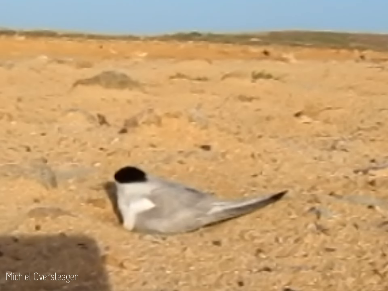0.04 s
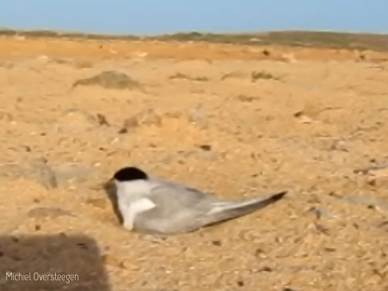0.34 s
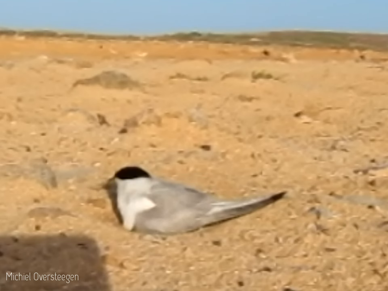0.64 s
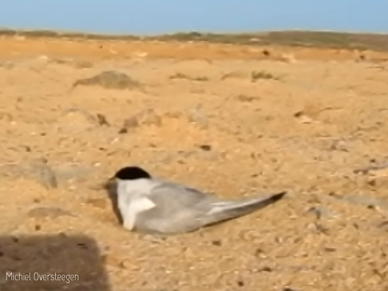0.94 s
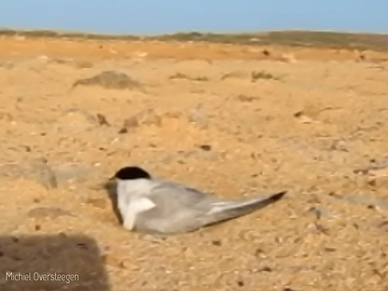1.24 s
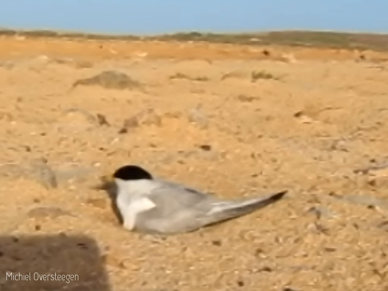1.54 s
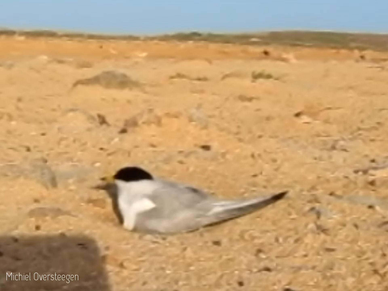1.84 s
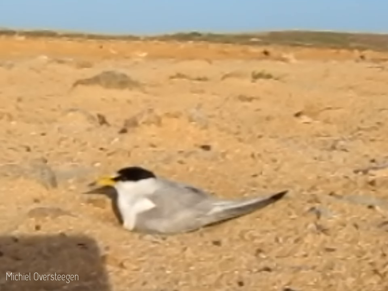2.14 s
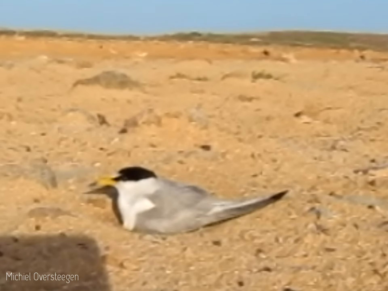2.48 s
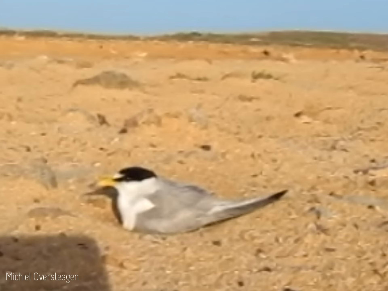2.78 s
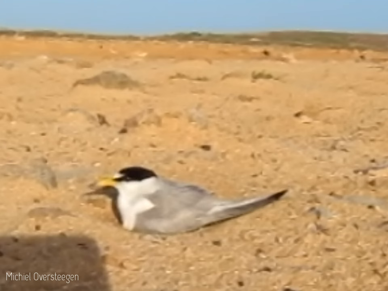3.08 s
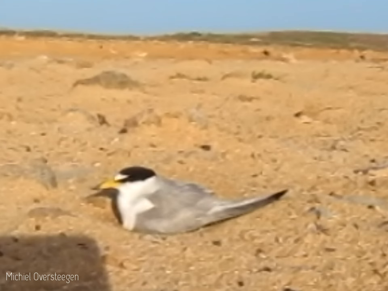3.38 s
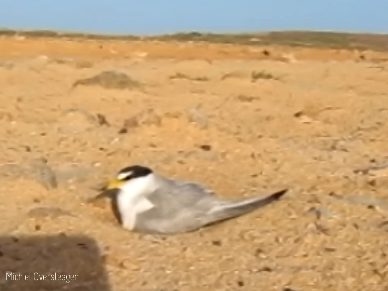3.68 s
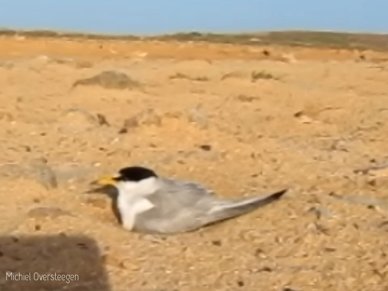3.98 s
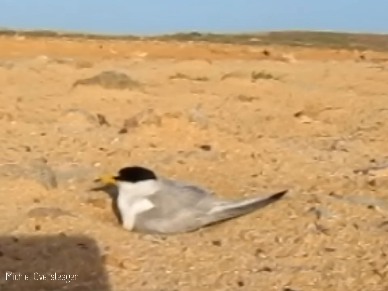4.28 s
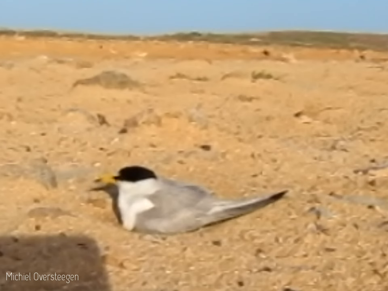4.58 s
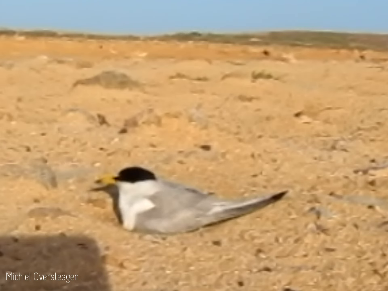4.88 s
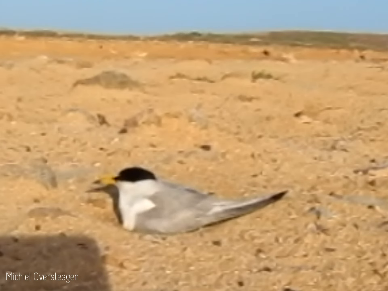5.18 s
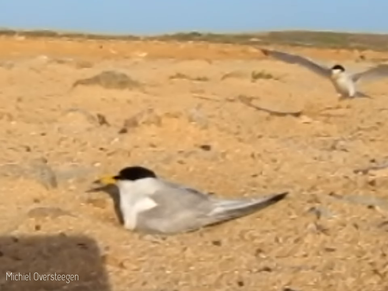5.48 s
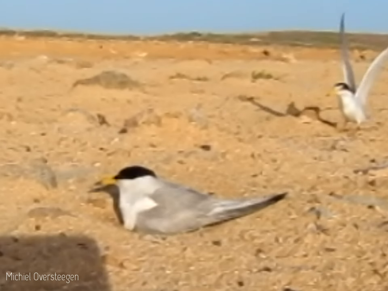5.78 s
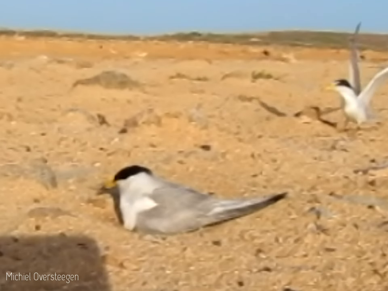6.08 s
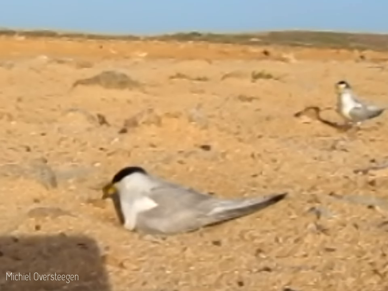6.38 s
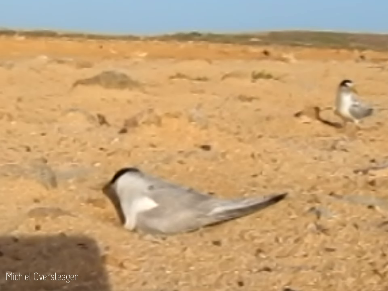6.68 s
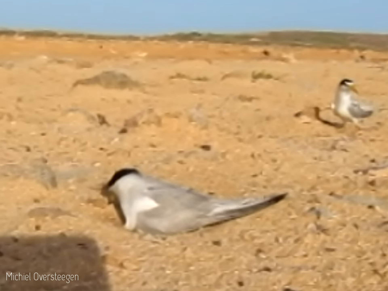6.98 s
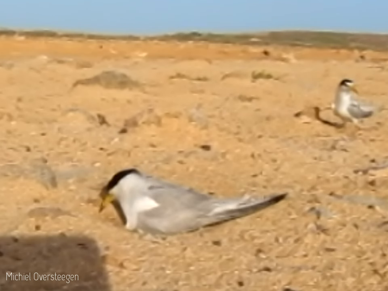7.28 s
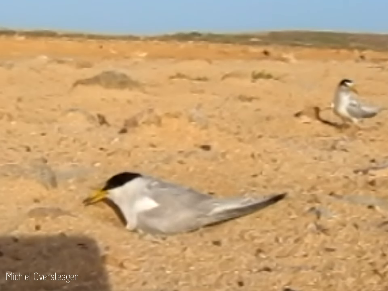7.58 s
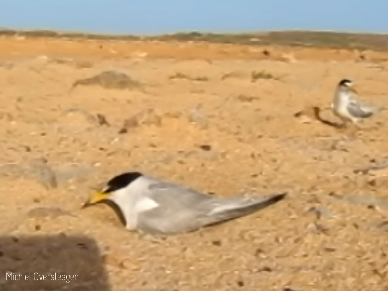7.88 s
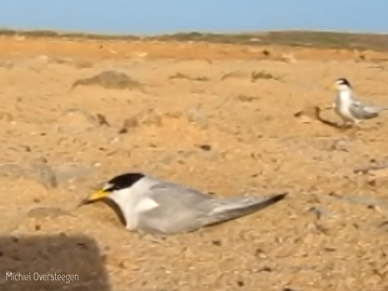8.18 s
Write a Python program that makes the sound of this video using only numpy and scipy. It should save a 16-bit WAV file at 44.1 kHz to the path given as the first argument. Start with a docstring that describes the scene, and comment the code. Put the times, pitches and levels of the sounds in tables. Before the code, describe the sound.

Gusty wind buffets the microphone on an open shore throughout, with low rumbling and irregular thumps over a very faint wash of distant surf. The wind is strong in the first second, eases until about 3.5 seconds, then returns hard at 4 and keeps gusting.

Terns give short, harsh calls, each a rattle that clears into a high note and drops away. These come singly at about 0.1, 0.7, 1.5 and 2.2 seconds, the second and fourth faint, then louder at 3.8 and 4.2. Between 4.7 and 5.2 seconds an arriving bird gives three shrill, cracking cries. Rasps then come more often: two at 5.6 and 5.9, three soft, hoarse ones from 6.2 to 6.7, and a louder, higher one near 6.9. Four quick chips follow from 7.1 to 7.3, then a faint rasp and a strong, high rising one around 7.7 seconds.

```python
"""Little terns on a windy shore

Terns call over a nest on open sand, each voice a vibrating membrane filtered by throat and beak.
Rasping calls start as a rattle, clear into a rising tone and fall off; a bird flying in gives sharp
cries, then chips after landing. Turbulent wind buffets the microphone with swings of pressure,
and a soft wash of distant surf lies behind."""
import sys
import numpy as np
from scipy import signal
from scipy.io import wavfile
from scipy.ndimage import uniform_filter1d, map_coordinates

SR = 44100
rng = np.random.default_rng(int(sys.argv[2]) if len(sys.argv) > 2 else 0)


def waveform_to_disk(signal):
    """Save audio, clipped to [-1, 1], as 16-bit WAV at the path in sys.argv[1]."""
    frames = np.transpose(np.atleast_2d(signal))
    scaled = np.clip(frames, -1, 1) * 32767
    samples = np.round(scaled).astype(np.int16)
    wavfile.write(sys.argv[1], SR, samples)


N = 372204
TIME = np.arange(N) / SR
CUTOFF_HZ = 15900
WAVER = .008   # relative pitch jitter of a clear voice


def from_db(db):
    """Amplitude ratio of a level in decibels."""
    return 10 ** (np.asarray(db) / 20)


def in_time(rows):
    """Linear interpolation of (time_s, value) rows at every sample."""
    return np.interp(TIME, *np.transpose(rows))


def at_hz(points, hz):
    """Interpolation of a spectrum on a log-frequency axis."""
    freqs, levels = np.transpose(points)
    return np.interp(np.log(hz), np.log(freqs), levels)


def drift(rate_hz, size=N):
    """A smooth random process of spread near 1, with `rate_hz` new values a second."""
    steps = np.arange(size) * rate_hz / SR
    return map_coordinates(rng.standard_normal(SR // 10), [steps], order=3, mode="mirror")


def during(start, end):
    """The sample times of one note."""
    return TIME[(TIME >= start) & (TIME < end)]


def add(out, start, sound):
    """Superposition: a sound adds to the mix from its start time."""
    first = max(int(start * SR), 0)
    out[first:first + len(sound)] += sound[:N - first]


def coloured_noise(colour):
    """Spectral shaping: weighted half-octave bands of white noise, scaled to unit power."""
    edges = 11 * 2 ** np.arange(0, 10.6, .5)
    white, out = rng.standard_normal((2, N + SR // 2)), 0
    for k, (low, high) in enumerate(zip(edges, edges[1:])):
        hz = np.sqrt(low * high)
        if colour[0][0] <= hz <= colour[-1][0]:
            bandpass = signal.butter(2, [low, high], "band", fs=SR, output="sos")
            out = out + signal.sosfilt(bandpass, white[k % 2])[-N:] * from_db(at_hz(colour, hz))
    return out / np.sqrt(np.mean(out ** 2) + 1e-20)


def surf():
    """Distant surf is broadband noise under a slow amplitude envelope."""
    # swell of the wash: time_s, level_db
    swell = [(0, -54.5), (1.2, -56.5), (3.0, -52), (3.65, -47), (4.02, -48), (4.18, -53), (8.44, -56)]
    # spectrum of the wash: frequency_hz, relative_db
    colour = [(200, 13), (1000, 10.5), (2000, 4.5), (3600, 4), (5200, -0.5), (7000, -9), (15500, -22.5)]
    return from_db(in_time(swell)) * coloured_noise(colour)


def wind_power(steepness=2.4):
    """Incoherent powers add: each gust is a bell-shaped swell on top of the breeze."""
    # light air between gusts: time_s, level_db
    breeze = [(0, -35.5), (1.65, -45), (3.1, -44), (4.0, -37), (8.44, -36.5)]
    # gusts at the microphone: crest_s, length_s, level_db
    gusts = [(0.244, 0.1, -21.5), (0.534, 0.22, -22), (0.762, 0.15, -23), (1.014, 0.17, -28.5),
             (1.202, 0.035, -27), (1.465, 0.22, -29), (1.779, 0.069, -30), (2.264, 0.093, -30.5),
             (2.353, 0.044, -25.5), (2.852, 0.024, -31.5), (3.531, 0.18, -27), (4.05, 0.24, -21),
             (4.101, 0.086, -17.5), (4.358, 0.049, -20.5), (4.593, 0.15, -21), (4.93, 0.18, -28.5),
             (5.308, 0.18, -26), (5.508, 0.038, -21.5), (5.684, 0.24, -22.5), (5.885, 0.038, -20),
             (6.037, 0.12, -23.5), (6.262, 0.042, -20), (6.416, 0.029, -20.5), (6.683, 0.11, -20),
             (6.861, 0.033, -22.5), (7.237, 0.058, -22.5), (7.366, 0.23, -24.5), (7.648, 0.042, -24),
             (7.767, 0.067, -25.5), (8.079, 0.11, -20), (8.223, 0.049, -19)]
    power = from_db(in_time(breeze)) ** 2
    for crest, length, level_db in gusts:
        away = 2 * np.abs(TIME - crest) / length
        power = power + from_db(level_db) ** 2 * np.exp(-np.minimum(away ** steepness, 20))
    return power


def wind(rumble_db=5.0, eddy_db=-1.0, usual_db=-26, ceiling_db=-17, inertia_s=.019, follow=.61):
    """Turbulent pressure: a slow rumble, and eddies that hit harder and pass faster in faster air."""
    # spectra of the rumble and the eddies: frequency_hz, relative_db
    rumble_colour = [(12, 1), (60, 0.5), (110, -5), (380, -25)]
    eddy_colour = [(35, -27), (120, 1), (260, 1.5), (450, -14), (700, -34), (1500, -58)]
    power = wind_power()
    swing_db = 10 * np.log10(uniform_filter1d(power, int(inertia_s * SR))) - usual_db
    lumps_db = 7.5 * np.tanh(drift(rate_hz=75))
    rumble = from_db(rumble_db + follow * swing_db + lumps_db / 2) * coloured_noise(rumble_colour)
    # the eddies level off, so the strongest gusts add mostly rumble
    gust_db = -10 * np.log10(1 / power + from_db(-ceiling_db) ** 2) - usual_db
    force = from_db(gust_db + lumps_db)
    # frozen turbulence: one pattern is carried across the microphone port at the speed of the air
    travelled = np.cumsum(force ** .18)
    eddies = map_coordinates(coloured_noise(eddy_colour), [travelled], order=3, mode="mirror")
    return from_db(usual_db) * (rumble + from_db(eddy_db) * force * eddies)


def small_vortices(count=130, lift_db=7, spread_db=3, pitch_hz=330, pitch_spread=.201):
    """Random arrivals, each scaled by the wind that carries it: time_s, strength_db, pitch_hz."""
    arrival = rng.integers(N, size=count)
    strength, detune = rng.standard_normal((count, 2)).T
    strength_db = 10 * np.log10(wind_power()[arrival]) + lift_db + spread_db * strength
    return list(zip(arrival / SR, strength_db, pitch_hz * np.exp(pitch_spread * np.tanh(detune))))


def buffets(gain_db=-2.0, body=.45, wake_db=-12, wake_s=.0045, tick_db=-34):
    """A vortex crossing the port makes a steep pressure pulse inside a broad one, then a brief wake."""
    # hard vortices: time_s, strength_db, pitch_hz
    hard_vortices = [(0.317, -3.5, 476), (0.323, -2.5, 487), (0.414, -6.5, 457), (0.487, -5, 400),
                     (0.583, -4.5, 346), (0.736, -3, 481.4), (0.757, -7.5, 408), (0.995, -4, 449),
                     (1.945, 0, 484), (3.388, -4, 304.5), (3.677, -3, 272.6), (3.991, -3.5, 488.1),
                     (4.096, -2.5, 401), (4.148, -4, 317.3), (4.165, -9, 398), (4.376, -10, 447),
                     (4.547, -2.5, 401.8), (4.558, -2, 317), (4.632, -10, 369), (5.34, -13.5, 431.5),
                     (5.5, -6.5, 329.2), (5.731, -7.5, 377), (5.998, 0, 287.3), (6.265, 1, 268.7),
                     (6.693, -2, 407), (7.298, -8, 298.8), (7.432, -7, 300.3), (8.076, -7, 491),
                     (8.116, 0, 573.3), (8.207, -2.5, 336)]
    out = np.zeros(N)
    t = np.arange(-SR // 20, SR // 20) / SR
    age = np.maximum(t, 0) / wake_s
    for time_s, strength_db, hz in hard_vortices + small_vortices():
        tick, core, skirt = (np.imag((1 - 2j * np.pi * f * t / 3) ** -4) for f in (hz * 6, hz, hz / 4))
        wake = age * np.exp(1 - age) * drift(2 * hz, len(t))
        # a sharp bright tick, like input overload, on the highest-pitched thumps
        tick_weight = np.clip((hz - 480) / 25, 0, 3)
        pulse = core + body * skirt + from_db(wake_db) * wake + from_db(tick_db) * tick_weight * tick
        add(out, time_s + t[0], from_db(strength_db + gain_db) * pulse)
    return out


def syrinx(t, pitch, level_db, gape, bright_hz, jitter, shimmer_db=3.98, purity_db=15):
    """Source and filter: a membrane's harmonics, shaped by throat and beak, with a little air noise."""
    # throat response with the beak nearly shut and wide open: frequency_hz, gain_db
    beak_shut = [(600, -15), (1200, 13.5), (3150, 1.5), (3750, -24), (4600, -22.5), (6300, -14.5),
                 (7300, -33), (8500, -29), (10000, -36.5), (15500, -33.5)]
    beak_open = [(600, -12), (1800, -14.5), (2300, -3.5), (2800, -5), (3400, 0.5), (4300, 0.5), (5700, -5),
                 (7200, -9), (8800, -19), (15500, -36.5)]
    lift_db, half_width_octaves = 4.5, .31   # the band that a call favours
    pitch = pitch * (1 + jitter * drift(900, len(t)))
    phase = 2 * np.pi * np.cumsum(pitch) / SR
    # a taut, high-pitched membrane closes softly and loses its top overtones
    taut = np.clip(pitch / 400 - 3, 0, 1)
    tone, power = 0, 0
    for k in range(1, 15):
        hz = k * pitch
        throat_db = (1 - gape) * at_hz(beak_shut, hz) + gape * at_hz(beak_open, hz)
        loss_db = purity_db * taut * np.interp(hz, [8200, 9400], [0, 1])
        bright_db = lift_db * np.exp(-np.square(np.log2(hz / bright_hz) / half_width_octaves))
        flicker_db = shimmer_db * drift(56, len(t))
        gain = from_db(throat_db - loss_db + bright_db + flicker_db) * (hz < CUTOFF_HZ)
        tone = tone + gain * np.sin(k * phase)
        power = power + gain ** 2 / 2
    air = .03 * drift(4000, len(t))
    edges = np.clip(np.minimum(t - t[0], t[-1] - t) / .003, 0, 1)
    return tone / np.sqrt(power) * (1 + air) * from_db(level_db) * edges


def chips(length_s=.031, sag=.61, fade_db=15, bright_hz=7000):
    """Coupled modulation: one push of air raises and lowers pitch and loudness together."""
    # short arched chips: start_s, top_hz, level_db, gape (0 shut, 1 open)
    notes = [ (7.099, 1431, -27, 0.53), (7.161, 1306, -29, 0.54), (7.225, 1375, -28, 0.49),
             (7.303, 1199, -31, 0.42)]
    out = np.zeros(N)
    for start, top_hz, level_db, gape in notes:
        t = during(start, start + length_s)
        slack = np.linspace(-1, 1, len(t)) ** 2
        pitch = top_hz * (1 - sag * slack)
        add(out, start, syrinx(t, pitch, level_db - fade_db * slack, gape, bright_hz, WAVER))
    return out


def cries(bright_hz=4400, ragged_s=.015, ragged=.037):
    """Register jumps: shrill open-beaked cries leap in pitch, and jitter frays both their ends."""
    # one contour for each cry: time_s, pitch_hz, level_db
    contours = [
        [(4.671, 1235, -29), (4.684, 1900, -14), (4.698, 1790, -18), (4.716, 1040, -35), (4.741, 1194, -21.5),
         (4.795, 1140, -22.5), (4.855, 1002, -20), (4.871, 726, -40)],
        [(4.959, 954, -29), (4.998, 1294, -23.5), (5.007, 1552, -16), (5.023, 1608, -18.5), (5.040, 1120, -31)],
        [(5.067, 1192, -42), (5.078, 1610, -18), (5.095, 1900, -16), (5.097, 1185, -17.5), (5.126, 1133, -23.5),
         (5.128, 1713, -17), (5.143, 1550, -21), (5.157, 990, -37)],
    ]
    out = np.zeros(N)
    for contour in contours:
        times, pitches, levels = np.transpose(contour)
        t = during(times[0], times[-1])
        pitch, level_db = np.interp(t, times, pitches), np.interp(t, times, levels)
        # the first cry cracks before the voice takes hold
        cracking = .06 * (t < 4.738) * np.clip((-14 - level_db) / 7, 0, 1)
        fraying = ragged * np.exp(-np.minimum(t - times[0], times[-1] - t) / ragged_s)
        add(out, times[0], syrinx(t, pitch, level_db, 1, bright_hz, WAVER + cracking + fraying))
    return out


def rasps(start_hz=1230, fall_s=.023, fall_ratio=.31, fade_db=18, sag=.35, creak=.04):
    """Pulse modulation: quick bursts of voice lengthen and fuse into a clear tone, which drops away."""
    # rasping calls: start_s, clear_s, crest_s, clear_hz, crest_hz, level_db, swell_db, gape, bright_hz
    calls = [ (.085, .207, .240, 1630, 1650, -28.5, 19, 0.43, 7450),
             (.645, 0.77, .812, 1270, 1220, -41.5, 2.5, 0.23, 7900),
             (1.481, 1.636, 1.640, 1944, 1860, -32, 10, 0.4, 7560),
             (2.176, 2.263, 2.323, 1207, 1241, -36, 2.5, 0.38, 12070),
             (3.755, 3.855, 3.884, 1298, 1438, -25, 23.5, 0.84, 5550),
             (4.183, 4.294, 4.328, 1645, 1605, -27.5, 14.5, 0.42, 8500),
             (5.582, 5.694, 5.730, 1290, 1264, -28.5, 7.5, 0.46, 9400),
             (5.911, 6.006, 6.036, 1192, 1249, -24.5, 6, 0.72, 11080),
             (6.24, 6.306, 6.349, 1111, 1084, -36.5, -2.5, .16, 11930),
             (6.454, 6.475, 6.482, 1127, 960, -37.5, -2, 0.31, 12100),
             (6.584, 6.665, 6.674, 990, 964, -39, -4, 0.2, 9000),
             (6.823, 6.97, 6.998, 1937, 2035, -24.5, 16.5, 0.48, 3200),
             (7.401, 7.468, 7.497, 1093, 997, -36.5, -7, .22, 4670),
             (7.603, 7.765, 7.798, 2090, 2310, -20, 17.5, 0.71, 3940)]
    # louder calls rattle more deeply: level_db, modulation_depth
    rattle_depth = [(-45, 0.2), (-31, 0.92)]
    shut_rate_hz, gape_rate_hz = 129.1, 41.7   # burst rate with the beak shut; extra when wide open
    first_duty, last_duty = .18, .72   # open share of a burst cycle at full depth
    out = np.zeros(N)
    for start, clear, crest, clear_hz, crest_hz, level_db, swell_db, gape, bright_hz in calls:
        t = during(start, crest + fall_s)
        build = np.clip((t - start) / (clear - start), 0, 1)
        rise = np.sin(np.pi / 2 * np.interp(t, [clear, crest], [0, 1]))
        drop = np.clip((t - crest) / fall_s, 0, 1) ** 1.5
        low_hz = min(start_hz, clear_hz)
        pitch = low_hz + (clear_hz - low_hz) * build + (crest_hz - clear_hz) * rise
        pitch *= 1 - (1 - fall_ratio) * drop
        # each burst opens and shuts the membrane once
        depth = np.interp(level_db, *np.transpose(rattle_depth))
        rate_hz = (shut_rate_hz + gape_rate_hz * gape) * (1 + .02 * drift(40, len(t)))
        cycle = np.cumsum(rate_hz) / SR % 1
        duty = first_duty + (last_duty - first_duty) * build + 1 - depth
        slack = np.clip((2 * cycle - 1) / duty, -1, 1) ** 2
        burst = (1 - slack) * from_db(drift(shut_rate_hz, len(t)))
        rattling = np.clip((clear - t) / .016 + .5, 0, 1)
        # pitch sags on both flanks of a burst and wanders between bursts, most in soft, hoarse calls
        wander = .07 * (1.35 - depth) * drift(shut_rate_hz, len(t))
        pitch *= 1 + rattling * (wander - depth * slack * sag)
        envelope_db = level_db - swell_db * (1 - build) ** 1.4 - fade_db * drop
        # the voice creaks in a weak rattle and as the pressure goes
        jitter = WAVER + creak * (rattling * (1 - depth) + drop)
        voice = syrinx(t, pitch, envelope_db, gape, bright_hz, jitter)
        add(out, start, voice * (1 - depth * rattling * (1 - burst)))
    return out


def scene():
    """Superposition of birds, wind and surf at one microphone."""
    return (rasps() + chips() + cries() + wind() + buffets() + surf())[None]


def record(dry):
    """Clipping and band limiting: the hardest gusts overload the input, and the top treble is cut."""
    lowpass = signal.ellip(10, .1, 90, CUTOFF_HZ, fs=SR, output="sos")
    return signal.sosfilt(lowpass, np.clip(dry, -.96, .96))


dry = scene()
out = record(dry)
waveform_to_disk(out)
```